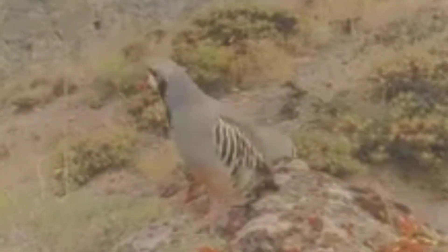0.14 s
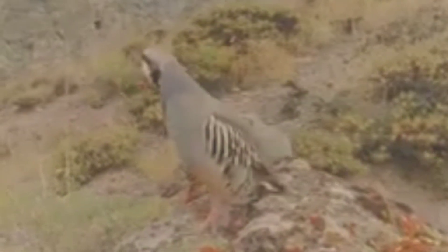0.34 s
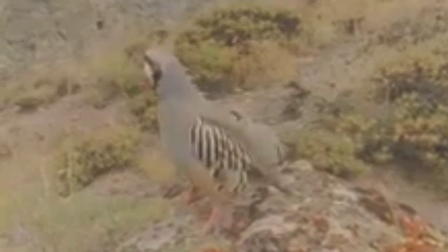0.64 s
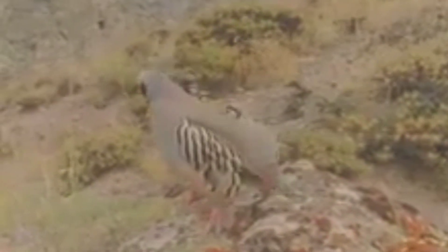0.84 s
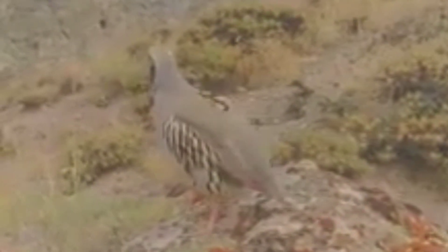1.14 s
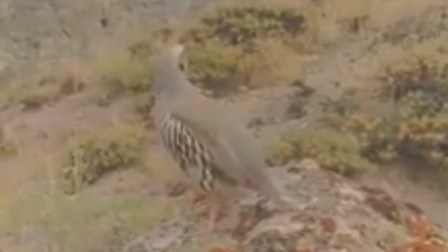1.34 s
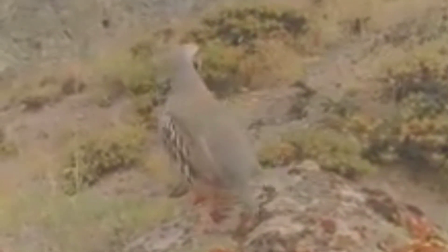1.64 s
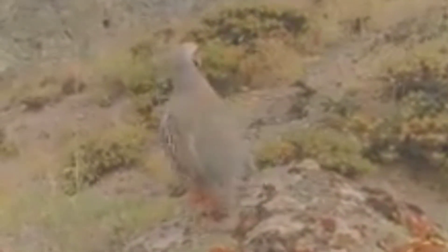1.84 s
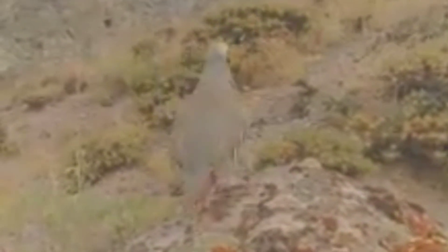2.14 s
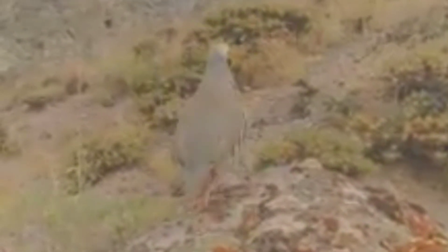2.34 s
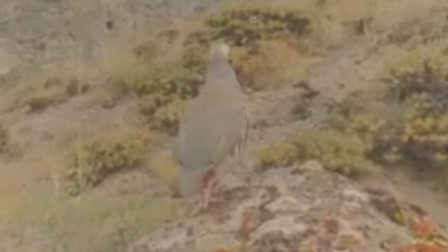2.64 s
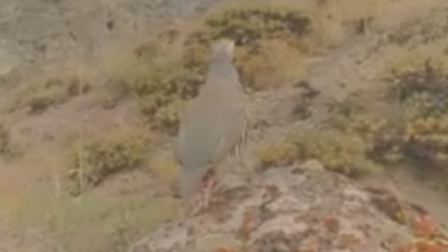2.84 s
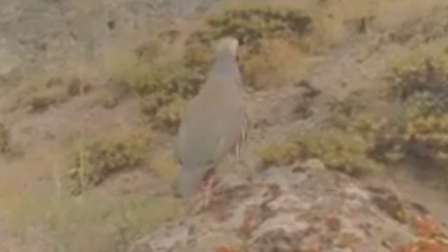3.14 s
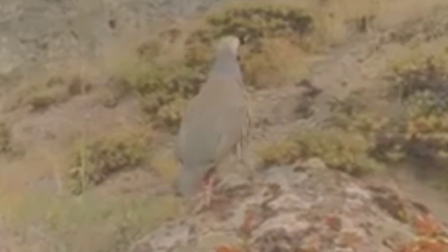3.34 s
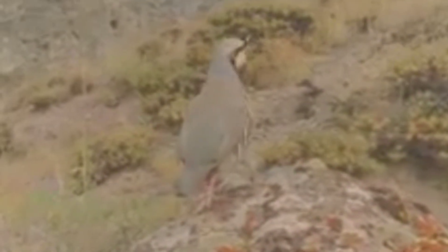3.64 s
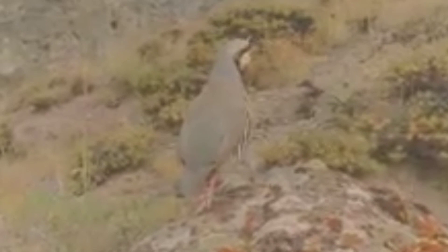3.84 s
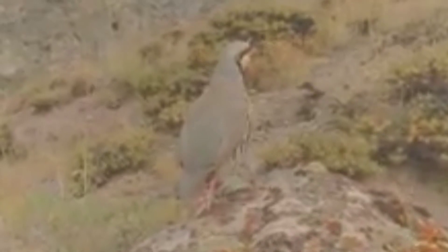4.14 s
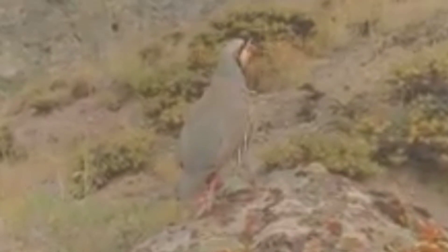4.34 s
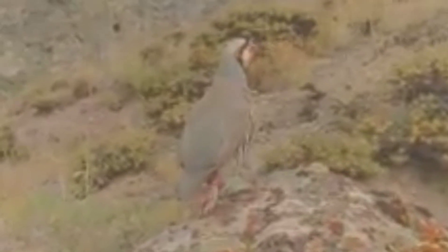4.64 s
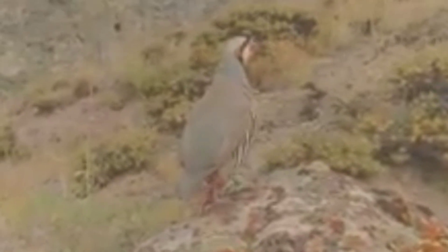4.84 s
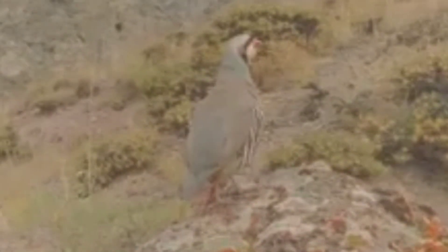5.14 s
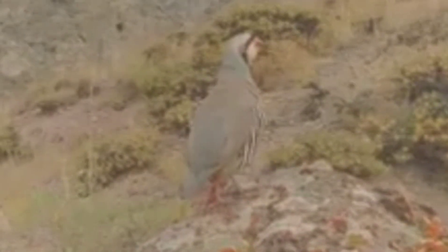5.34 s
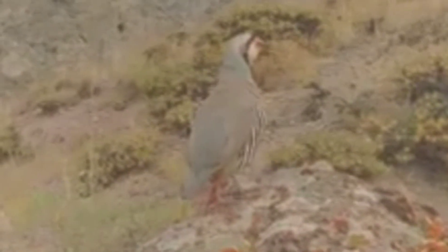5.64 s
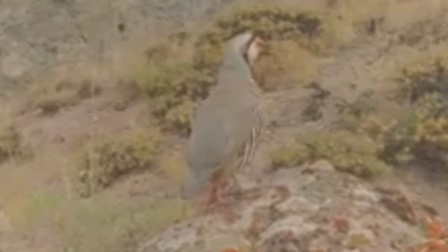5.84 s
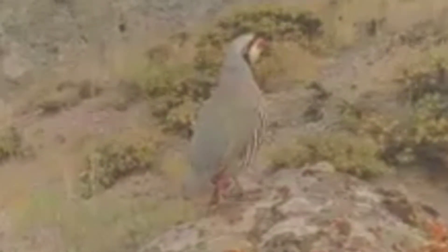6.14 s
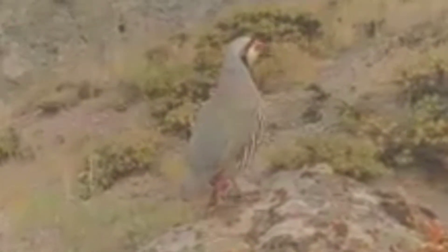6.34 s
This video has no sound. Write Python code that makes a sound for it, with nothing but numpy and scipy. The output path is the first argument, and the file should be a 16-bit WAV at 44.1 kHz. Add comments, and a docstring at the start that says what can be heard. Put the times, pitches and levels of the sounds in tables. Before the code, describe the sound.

Outdoors in nearly still air, a game bird near the microphone works up a rally call: sparse hoarse notes first, then tight repeated bursts, then alternating raspy notes and hollow low clucks. Tiny whines slide in between. The stones add only a very short, dry tail. Bright gritty scuffs, slightly left, accompany the ending; afterwards just quiet air and two tiny soft taps.

```python
"""Rally call of a chukar partridge

On a rock of an open hillside the bird works up runs of short, raspy notes, with brief gliding whines
and, as it speeds up, low closed-beak clucks. Each is a pulsed source shaped by resonant filters.
Dry scuffs (decaying noise) sound under the last notes and two faint taps follow.
Stony ground adds a short noise-like tail; the almost still air is a wide hush with a few low bumps."""
import sys
import numpy as np
from scipy import signal
from scipy.fft import rfft, irfft, next_fast_len
from scipy.io import wavfile

SR = 44100
rng = np.random.default_rng(int(sys.argv[2]) if len(sys.argv) > 2 else 0)


def generate_wav(sig):
    """Save sig (samples, or channels by samples) to the path in sys.argv[1] as 16-bit PCM at SR."""
    pcm = np.round(np.clip(np.atleast_2d(sig).T, -1, 1) * 32767).astype(np.int16)
    wavfile.write(sys.argv[1], SR, pcm)


N = 285768
PAD = 256  # silent samples ahead of a sound that is filtered

# resonances of the open throat: [f/Hz, relative level/dB]
THROAT = [(80, -57.5), (180, -22), (300, -16), (550, -7.5), (900, -1.5), (1300, -4), (1600, -12),
          (2200, -69), (5000, -46.5)]
# strain moves sound from the throat up into the mouth: mouth level over the throat's
MOUTH_SLACK_DB, MOUTH_PER_STRAIN_DB = -11.5, 26.5


def undb(db):
    """Level to amplitude: 20 dB is a factor of ten."""
    return 10 ** (np.asarray(db) / 20)


def unit(x):
    """Normalization to an rms amplitude of 1."""
    return x / np.sqrt(np.mean(x ** 2) + 1e-18)


def colour(x, points):
    """Minimum-phase filtering by [f/Hz, level/dB] points: resonances ring after what excites them."""
    hz, db = np.transpose(points)
    size = x.shape[-1]
    f = np.maximum(np.fft.rfftfreq(size, 1 / SR), 1)
    gain = undb(np.interp(np.log(f), np.log(hz), db))
    # folding the cepstrum onto positive times makes the filter causal
    cepstrum = irfft(np.log(gain), size)
    cepstrum[1:size // 2] *= 2
    cepstrum[size // 2 + 1:] = 0
    return irfft(rfft(x) * np.exp(rfft(cepstrum)), size)


def wander(count, rate):
    """Band-limited random motion: straight lines between normal draws, rate of them per second."""
    at = np.arange(count) * rate / SR
    knots = int(at[-1]) + 2
    return np.interp(at, np.arange(knots), rng.standard_normal(knots))


def add(out, start, x):
    """Superposition of a sound at its start time in seconds."""
    i = max(int(start * SR), 0)
    out[i:i + len(x)] += x[:len(out) - i]


def still_air(level_db=-70.5, sway_db=1, sway_hz=5.17):
    """Diffuse field: independent mid and side noise makes a wide hush whose level sways a little."""
    # hush spectrum: [f/Hz, relative level/dB]
    air_spectrum = [(30, -14), (60, -25), (130, -20), (200, -17.5), (330, -9), (450, -8.5), (1400, -9.5),
                    (2400, -22.5), (3800, -15.5), (5200, -24), (6200, -17.5), (15500, -26)]
    # share of unrelated sound at the two ears: [f/Hz, side minus mid level/dB]
    air_width = [(60, 15), (130, 18.5), (200, 12), (400, 0), (1200, -20), (2400, -7.5), (8000, -3),
                 (15000, -10.5)]
    mid = unit(colour(rng.standard_normal(N), air_spectrum))
    side = unit(colour(rng.standard_normal(N), air_spectrum))
    side = colour(side, air_width)
    return np.array([mid + side, mid - side]) * undb(level_db + sway_db * wander(N, sway_hz))


def syrinx(hz, rough, halves, jitter=0.093, shimmer=1.0, turbulence=1.0, flutter_hz=900,
           waver=0.033, waver_hz=170, dispersion=.7):
    """Membrane oscillation: roughness scatters the pulses and admits pulsed air; halves alternates them."""
    count = len(hz)
    flutter = jitter * rough * wander(count, flutter_hz)
    slow_waver = waver * np.sqrt(rough) * wander(count, waver_hz)
    phase = 2 * np.pi * (np.cumsum(hz * (1 + flutter + slow_waver)) / SR + rng.random())
    k = np.arange(1, int(SR / 3 / hz.max()))[:, None]  # partial numbers
    # the half-rate term makes alternate pulses strong and weak
    size = 1 + shimmer * rough * wander(count, flutter_hz) + halves * np.cos(phase / 2)
    # the windpipe delays the upper partials, which smears each pulse
    partials = np.cos(k * phase - dispersion * k ** 2)
    pulses = unit(partials.sum(axis=0) * size)
    # air rushes through once a cycle
    air = unit(rng.standard_normal(count) * (1 + np.cos(phase)))
    return pulses + turbulence * rough * air, air


def beak(hz, boost_db=16, octaves=0.34):
    """Cavity resonance: one peak, at the beak's frequency, raised on the spectrum of the mouth."""
    # passage of the mouth: [f/Hz, relative level/dB]
    mouth_passage = np.array([(200, -74.5), (1000, -23.5), (1400, 1.5), (1900, -2), (2450, -8), (2900, 3),
                              (3500, -6.5), (4500, -38.5), (9000, -48)])
    grid = np.geomspace(200, 9000, 80)
    base = np.interp(np.log(grid), np.log(mouth_passage[:, 0]), mouth_passage[:, 1])
    peak = boost_db / (1 + (np.log2(grid / hz) / octaves) ** 2)
    return np.transpose([grid, base + peak])


def syllable(length, crest, pitches, rough, halves, throat, mouth_hz, mouth_db, rasp_db,
             spill=1.55, swell=1.52, open_power=1.37, rasp_power=1.38, rasp_air=0.8, mouth_air=0.77,
             opening=0.09):
    """Source and filter: one push of air drives throat, mouth and rasp; the upper two favour the crest."""
    # rasp resonances: [f/Hz, relative level/dB]
    rasp_spectrum = [(200, -74), (2600, -20.5), (3800, 0), (4600, 3.5), (5300, -0.5), (6200, -3.5),
                     (7600, -16.5), (9000, -15.5), (11000, -27.5), (15000, -15)]
    u = np.linspace(0, 1, int(length * spill * SR))  # the sound spills past its nominal length
    centred = (2 * u - 1) * spill  # -1 and 1 are the nominal ends
    # a parabola through the pitches at start, middle and end
    hz = np.polyval(np.polyfit([-1, 0, 1], pitches, 2), np.clip(centred, -1, 1))
    course = np.interp(u, [0, np.clip(crest, .1, .9), 1], [0, .5, 1])
    push = np.abs(np.sin(np.pi * course)) ** swell
    voice, air = syrinx(hz, np.clip(rough, 0, 1), halves)
    size = next_fast_len(len(u) + 2 * PAD)

    def through(drive, shape):
        """Resonant filtering with silence around the drive, so that the ringing has room."""
        return colour(np.pad(drive, (PAD, size - len(u) - PAD)), shape)

    oral = (voice + mouth_air * rough * air) * push ** open_power
    # the opening beak is a crossfade from a lower to a higher resonance
    opened = np.clip(.5 + centred, 0, 1)
    narrow = through(oral * (1 - opened), beak(mouth_hz * (1 - opening)))
    wide = through(oral * opened, beak(mouth_hz * (1 + opening)))
    mouth = narrow + wide
    rasp = through((voice + rasp_air * air) * push ** rasp_power, rasp_spectrum)
    upper = unit(mouth) + undb(rasp_db) * unit(rasp)
    out = unit(through(voice * push, throat)) + undb(mouth_db) * upper
    # unit level over the nominal length; also return the time from start to middle
    return unit(out) * np.sqrt(length * SR / size), (PAD + len(u) / 2) / SR


def notes(crest=0.52, doubling=0.33, scoop=0.1402, droop=.04, droop_per_s=.018, climb_per_strain=.2,
          rough_slack=0.62, clean_per_strain=0.37, hoarse_per_s=0.024, rasp_narrow_db=-21,
          rasp_per_gape_db=17, narrow_hz=1592, octaves_per_gape=0.54):
    """Driven membrane and tract: strain sets brightness, bend and roughness; gape, rasp and resonance."""
    # raspy open-beak notes: [middle t/s, nominal length t/s, level/dB, middle pitch f/Hz, strain 0-1,
    # gape of the beak 0-1]; levels hold before the ear gains
    note_table = [(0.156, .046, -52.5, 862, 0.42, 0.74), (0.324, 0.047, -52, 694, 0.49, 0.52),
                  (0.347, 0.024, -54, 878, 0.32, .22), (0.516, 0.017, -55, 854, 0.55, 0.57),
                  (0.536, 0.022, -50.5, 904, 0.66, .58), (0.571, .023, -51, 846, 0.59, 0.58),
                  (.702, .014, -50, 858, 0.76, 0.54), (0.727, 0.014, -44, 892, 0.68, 0.63),
                  (0.756, .029, -49.5, 718, 0.33, .6), (1.195, .028, -48.5, 920, 0.85, 0.47),
                  (1.237, .028, -47.5, 818, 0.53, 0.49), (1.428, .014, -48, 900, 0.77, 0.06),
                  (1.445, .017, -43.5, 949, 0.83, 0.65), (1.481, .019, -47, 868, 0.56, .62),
                  (1.654, .016, -44, 910, 0.67, 0.37), (1.679, 0.017, -43, 980, 1, 0.75),
                  (1.71, 0.02, -46.5, 913, 0.54, 0.67), (1.753, 0.027, -46, 681, 0.21, 0.44),
                  (1.869, .011, -45, 960, .4, 0.75), (1.896, .015, -42, 1038, 1, 0.66),
                  (1.936, 0.027, -48.5, 833, 0.36, 0.84), (2.086, .017, -44.5, 943, 0.55, 0.52),
                  (2.114, 0.019, -43, 1025, .92, 0.64), (2.156, .024, -48, 870, 0.58, 0.63),
                  (2.2, 0.034, -45, 688.6, 0.21, .28), (2.319, .017, -44.5, 831, 0.37, 0.53),
                  (2.352, .023, -45.5, 1038, 0.7, 0.8), (2.39, .023, -48, 872, 0.31, 0.9),
                  (2.414, .016, -58, 620, .12, .44), (2.571, .017, -49, 956, 0.28, 0.6),
                  (2.597, 0.021, -47.5, 1055, 0.87, 1), (2.631, 0.018, -48, 860, 0.43, 0.78),
                  (2.742, .017, -44.5, 746, .6, .02), (2.775, 0.024, -44.5, 877, .35, 0.94),
                  (2.818, .03, -48.5, 776.4, 0.2, 0.97), (2.944, .018, -43.5, 943, .15, 0.7),
                  (2.974, 0.024, -48.5, 1031, 0.8, 0.96), (3.011, 0.026, -53, 835, .45, 0.92),
                  (3.167, 0.023, -43, 826, 0.43, 0.46), (3.199, 0.022, -47, 1001, 0.74, 0.87),
                  (3.24, 0.027, -47.5, 921, 0.29, 0.93), (3.431, 0.026, -49, 878, 0.43, 0.64),
                  (3.460, 0.017, -46, 1084, 0.84, 1), (3.505, 0.025, -47, 874, 0.39, 0.83),
                  (3.873, .022, -40, 875, 0, .2), (4.106, 0.022, -49.5, 866, 0.38, 0.3),
                  (4.119, .016, -44.5, 972, 0.3, 1), (4.142, .016, -47, 915, 0.23, 1),
                  (4.25, 0.021, -44.5, 896, 0.05, 0.05), (4.274, .024, -41, 852.6, 0.04, 0.94),
                  (4.425, 0.02, -41.5, 941, 0.4, 0.87), (4.468, .017, -45, 675, 0.2, 0.98),
                  (4.555, 0.024, -42.5, 848, .35, 0.44), (4.594, 0.023, -45, 923, 0.28, 0.88),
                  (4.744, 0.022, -43, 841, 0.35, 0.6), (4.773, .024, -40.5, 979, 0.52, 0.61),
                  (4.797, .032, -50, 784, 0.26, 0.8), (4.823, .02, -43, 908, 0.19, .9),
                  (4.846, .023, -54, 647, 0, .56), (4.935, 0.027, -42.5, 994, 0.26, 0.86),
                  (4.992, 0.031, -42.5, 829, 0.05, 0.87), (5.082, 0.022, -39.5, 929, 0.19, 0.5),
                  (5.116, 0.029, -44.5, 1002, 0.56, 0.75), (5.163, 0.029, -43, 780.5, 0.02, 0.95),
                  (5.333, .024, -40, 975, .38, 0.39), (5.364, 0.022, -44.5, 998, .8, .86),
                  (5.413, 0.026, -44.5, 948, 0.22, 0.72), (5.559, .025, -38.5, 873, 0.28, .1),
                  (5.59, .016, -54, 642, 0.3, 0.6), (5.663, 0.025, -47, 802, 0.24, 0.7),
                  (5.77, .022, -42.5, 861, 0.41, 0.08), (5.882, 0.036, -44.5, 737, 0.29, 0.6),
                  (5.968, 0.022, -47.5, 568, 0.44, 0.64), (6.01, 0.032, -43.5, 910, 0.23, 0.14)]
    out = np.zeros(N)
    for at, length, db, hz, strain, gape in note_table:
        # scoop up to pitch; the end droops, more so late in the call, but strain makes it climb
        end = 1 - droop - droop_per_s * at + climb_per_strain * strain
        pitches = hz * np.array([1 - scoop, 1, end])
        # strained notes are cleaner; the voice grows hoarser as the call goes on
        rough = rough_slack - clean_per_strain * strain + hoarse_per_s * at
        mouth_hz = narrow_hz * 2 ** (octaves_per_gape * gape)
        mouth_db = MOUTH_SLACK_DB + MOUTH_PER_STRAIN_DB * strain
        rasp_db = rasp_narrow_db + rasp_per_gape_db * gape  # over the mouth's level
        sound, lead = syllable(length, crest, pitches, rough, doubling * rough, THROAT,
                               mouth_hz, mouth_db, rasp_db)
        add(out, at - lead, undb(db) * sound)
    return out


def hillside(x, near_db=-12, near_t60=0.15, far_db=-27, far_t60=0.16, left_db=-0.32, right_db=-0.14):
    """Scattering: near stones give a short tail, the far slope a fainter, slightly longer one, per ear."""
    # colour of the scattered sound: [f/Hz, level/dB]
    tail_colour = [(200, -8), (600, -2), (1200, -5), (2000, 5.5), (4000, 7.5), (9000, 14.5), (15000, -4.5)]
    t = np.arange(SR // 2) / SR
    response = 0
    for db, t60 in ((near_db, near_t60), (far_db, far_t60)):
        # 60 dB of decay in t60 seconds
        scatter = rng.standard_normal((2, len(t))) * np.exp(-np.log(1000) * t / t60)
        response = response + undb(db) * unit(scatter) / np.sqrt(len(t))
    tail = signal.fftconvolve(colour(x, tail_colour)[None], response, axes=1)[:, :N]
    return (x + tail) * undb([[left_db], [right_db]])


def whines(crest=0.43, rough=0.27, halves=0.03, sag=0.0253, mouth_hz=1750, rasp_db=-23):
    """Near-periodic oscillation: soft, nearly clean glides through a barely open beak."""
    # gliding whines: [middle t/s, nominal length t/s, level/dB, start pitch f/Hz, end pitch f/Hz,
    # strain 0-1]; levels hold before the ear gains
    whine_table = [(1.022, 0.025, -46.5, 714, 1194, 0), (1.058, 0.041, -53.5, 587, 828, 0.5),
                   (1.268, 0.043, -55.5, 882, 856, 0.88), (1.339, 0.084, -57, 1000, 578, 0.35),
                   (2.509, 0.041, -50, 627, 920, 0.52), (3.685, .039, -50, 588, 888, 0.53),
                   (4.701, 0.03, -48.5, 611, 1260, 0.57), (4.725, .036, -51.5, 823, 755, .7),
                   (5.86, 0.034, -53, 804, 700, 1)]
    out = np.zeros(N)
    for at, length, db, first, last, strain in whine_table:
        pitches = (first, (1 - sag) * (first + last) / 2, last)
        mouth_db = MOUTH_SLACK_DB + MOUTH_PER_STRAIN_DB * strain
        sound, lead = syllable(length, crest, pitches, rough, halves, THROAT, mouth_hz, mouth_db, rasp_db)
        add(out, at - lead, undb(db) * sound)
    return out


def clucks(crest=0.55, fall=0.128, rough=0.61, halves=0.72, mouth_hz=1500, sealed_db=-36, leak_db=34,
           rasp_db=-12):
    """Subharmonic pulsing behind a shut beak: every other pulse is weak, and the rate sags."""
    # closed-beak clucks: [middle t/s, nominal length t/s, level/dB, middle pulse rate f/Hz,
    # leak through the beak 0-1]; levels hold before the ear gains
    cluck_table = [(2.665, 0.013, -56.5, 501, 0.76), (3.137, 0.0087, -57, 514, 0.78),
                   (3.275, .024, -49.5, 341.4, 0.63), (3.399, 0.017, -46.5, 225, 0.2),
                   (3.535, 0.023, -53.5, 383.5, 0.6), (3.658, .019, -38.5, 444, 0.2),
                   (3.778, 0.016, -40, 432.6, 0.32), (3.893, .02, -40, 502, 0.49),
                   (4.014, .013, -45.5, 330.4, .05), (4.303, 0.013, -56, 326, .75),
                   (4.387, .022, -39, 541, .75), (4.509, 0.012, -38, 405, 0),
                   (4.655, 0.0089, -57.5, 421, .35), (4.897, 0.021, -41, 504, .85),
                   (5.0385, 0.016, -37.5, 535.3, .08), (5.281, .024, -41.5, 355.3, 0.28),
                   (5.425, 0.021, -45.5, 408.6, 0.97), (5.798, .017, -48, 539, 0.8)]
    # the throat with the beak shut: [f/Hz, relative level/dB]
    shut_throat = [(70, -27), (160, -38), (320, -8.5), (450, -7), (650, -7.5), (1000, 2.5), (1250, -9.5),
                   (1600, -29), (2200, -52), (5000, -48)]
    out = np.zeros(N)
    for at, length, db, hz, leak in cluck_table:
        pitches = hz * (1 + fall * np.array([1, 0, -1]))
        mouth_db = sealed_db + leak_db * leak
        sound, lead = syllable(length, crest, pitches, rough, halves, shut_throat,
                               mouth_hz, mouth_db, rasp_db)
        add(out, at - lead, undb(db) * sound)
    return out


def bumps(hz=76, width=0.0075, imbalance=0.52):
    """Pressure gradient: slow swings of air push the two microphone ports in opposite directions."""
    # low bumps of air: [middle t/s, level of the left envelope's peak/dB]
    bump_table = [(4.272, -60), (4.39, -60), (4.868, -48)]
    out, t = np.zeros(N), np.arange(N) / SR
    for at, db in bump_table:
        envelope = np.exp(-((t - at) / width) ** 2)
        out += undb(db) * envelope * np.sin(2 * np.pi * hz * (t - at))
    return np.array([out, -imbalance * out])


def scuffs(grain_db=2.5, grain_hz=1500):
    """Modulated noise: bright, gritty brushes that start fast and die away exponentially."""
    # dry scuffs: [start t/s, level before envelope and ear gains/dB, rise t/s, decay time constant t/s]
    scuff_table = [(5.555, -43, 0.006, 0.023), (5.66, -39, 0.0077, 0.0056), (5.864, -43.5, 0.0063, 0.033),
                   (5.958, -48, 0.0053, 0.011), (5.968, -36, 0.0015, 0.0051)]
    # spectrum of the grit: [f/Hz, relative level/dB]
    scuff_spectrum = [(1500, -31), (4000, -12.5), (7500, -14), (10000, -4.5), (13000, -2), (15500, -3)]
    out, t = np.zeros(N), np.arange(SR // 8) / SR
    for start, db, rise, decay in scuff_table:
        grains = undb(grain_db * wander(len(t), grain_hz))
        grit = unit(colour(rng.standard_normal(len(t)) * grains, scuff_spectrum))
        envelope = np.minimum(t / rise, 1) * np.exp(-np.maximum(t - rise, 0) / decay)
        add(out, start, undb(db) * grit * envelope)
    return out


def taps(decay=0.0012):
    """Impulsive excitation: brief noise bursts, dulled by the same resonances as the open throat."""
    # faint soft taps: [start t/s, level before decay, filter and ear gains/dB]
    tap_table = [(6.25, -27.5), (6.268, -26.5)]
    out, t = np.zeros(N), np.arange(SR // 40) / SR
    for start, db in tap_table:
        add(out, start, undb(db) * unit(rng.standard_normal(len(t))) * np.exp(-t / decay))
    return colour(out, THROAT)


def scene(scuff_left_db=3.0, scuff_right_db=-1):
    """Superposition: the bird on its rock, scuffs a little to the left, in the hush of the slope."""
    bird_and_taps = hillside(notes() + whines() + clucks() + taps())
    grit = hillside(scuffs()) * undb([[scuff_left_db], [scuff_right_db]])
    return bird_and_taps + grit + still_air() + bumps()


def record(dry, top_hz=15700):
    """Band limiting: a steep elliptic low-pass cuts the top."""
    low_pass = signal.ellip(8, .2, 70, top_hz, fs=SR, output="sos")  # ripple and stopband in dB
    return signal.sosfilt(low_pass, dry)


dry = scene()
out = record(dry)
generate_wav(out)
```